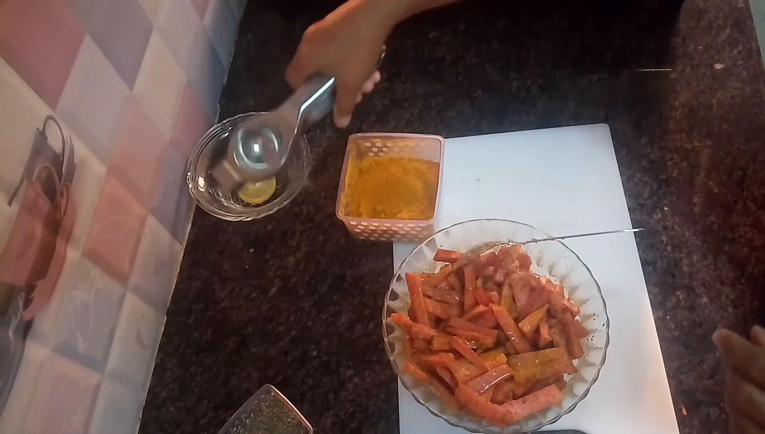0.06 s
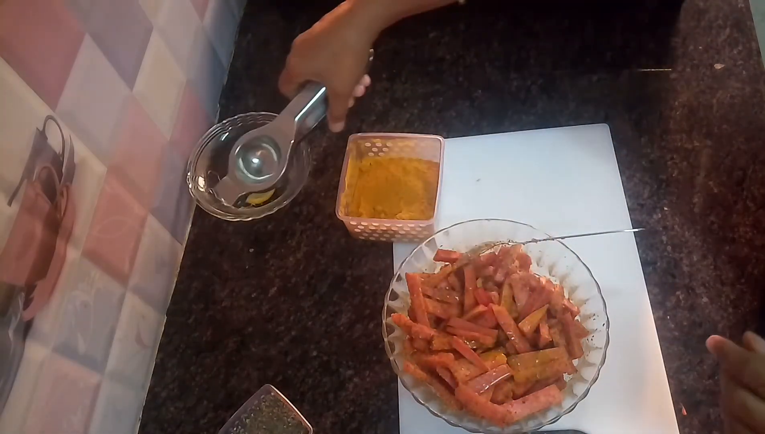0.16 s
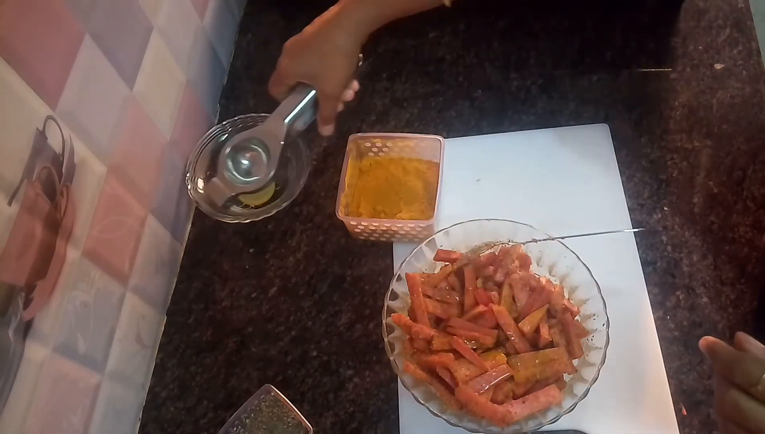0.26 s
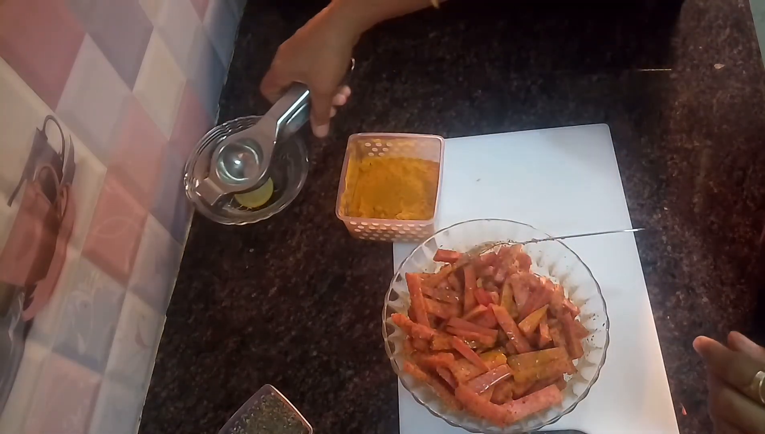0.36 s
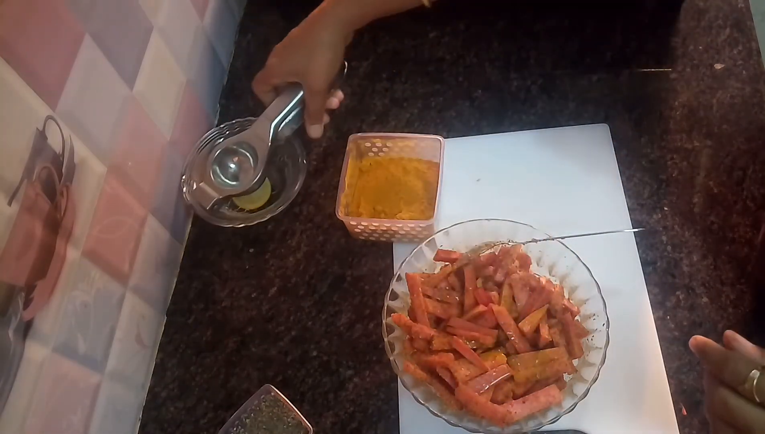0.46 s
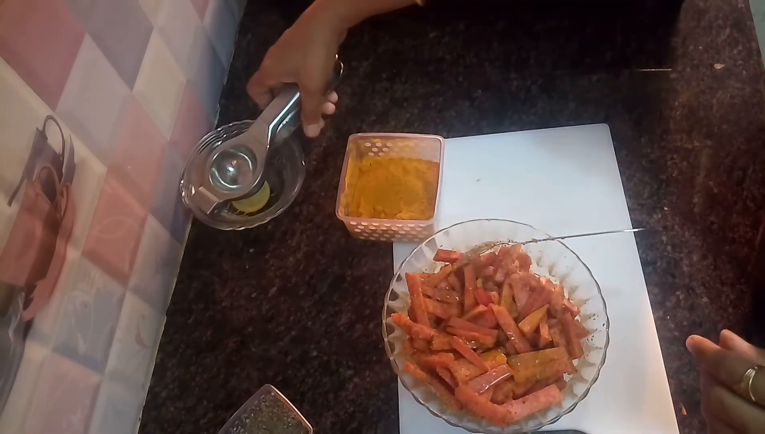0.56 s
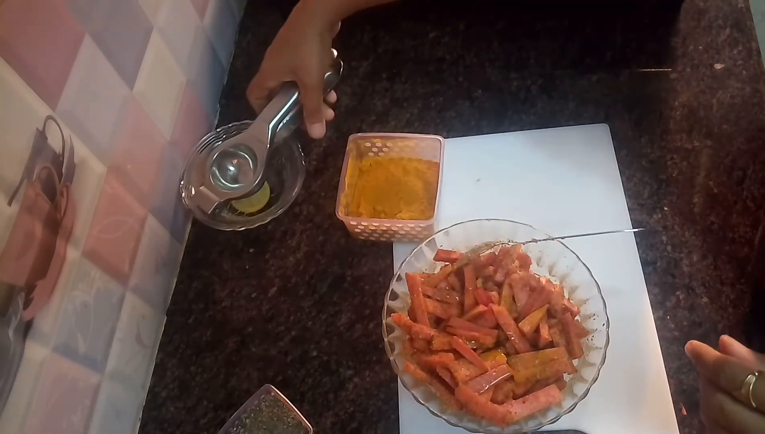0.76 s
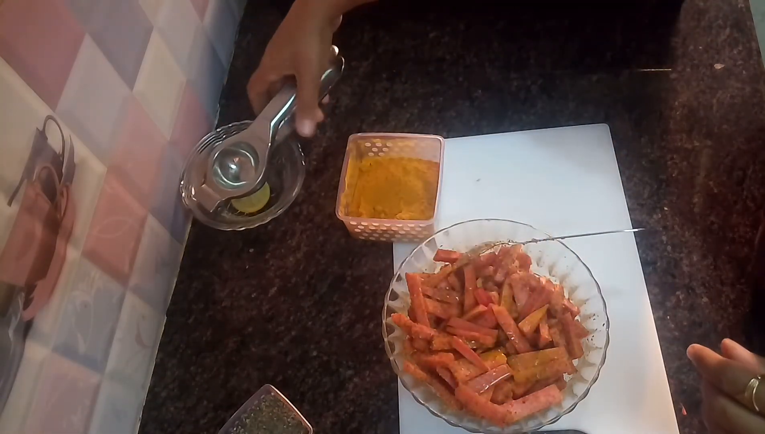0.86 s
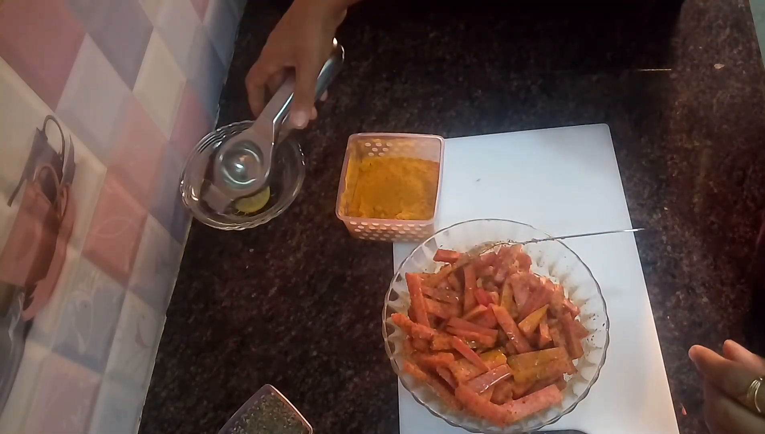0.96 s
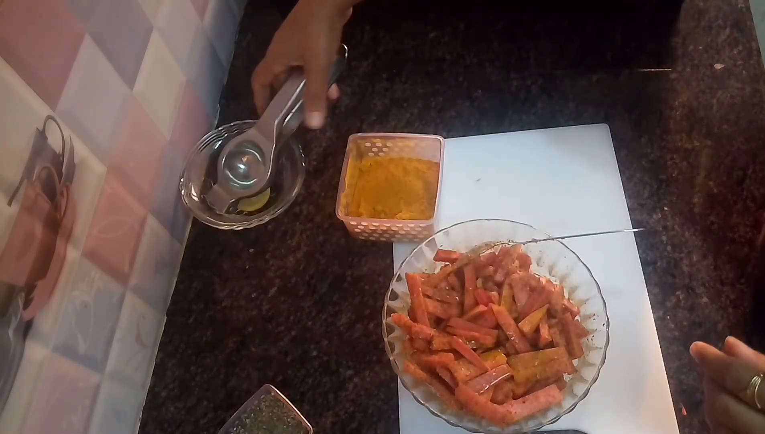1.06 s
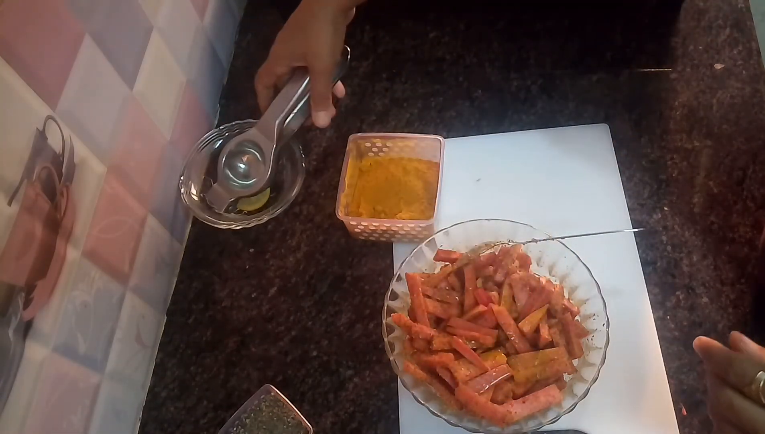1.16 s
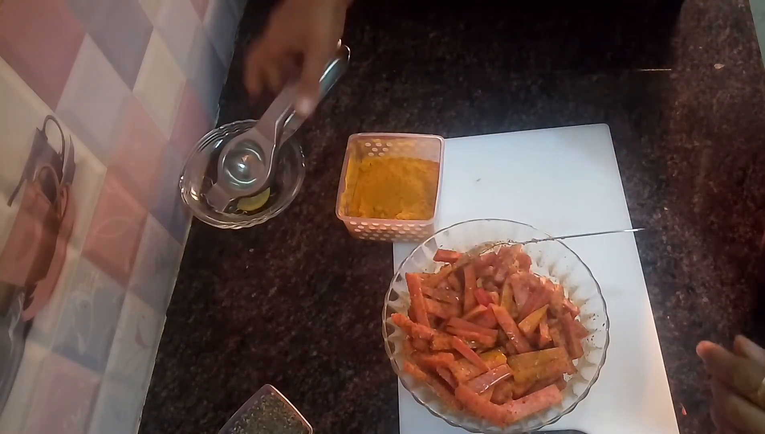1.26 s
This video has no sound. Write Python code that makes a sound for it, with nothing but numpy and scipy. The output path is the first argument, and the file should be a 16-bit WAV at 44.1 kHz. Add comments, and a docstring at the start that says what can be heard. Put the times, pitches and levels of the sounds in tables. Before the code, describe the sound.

A metal lemon squeezer clinks onto the rim of a small glass bowl at about 0.2 seconds, making it ring briefly. From 0.4 to 0.6 seconds its hinged steel arms clatter together and ring on a little. Near 1 second it shifts on the glass with a faint scrape and four soft taps. Everything is close, with a short kitchen echo and a low hum underneath.

```python
"""A tiled kitchen with a low hum; a stereo microphone close to a small glass bowl on a stone counter.
At 0.2 s a metal lemon squeezer is laid across the bowl, clinks on the rim and settles. Each contact
is a thud, a clack and a bright tick, and sets bowl and counter ringing while the room answers.
From 0.4 s its hinged steel arms clatter together and ring on a little.
Near 1 s the hand lets go and it shifts faintly on the glass, with a short scrape and four soft taps."""
import sys
import numpy as np
from scipy import signal
from scipy.fft import rfft, irfft
from scipy.io import wavfile

SR = 44100
rng = np.random.default_rng(int(sys.argv[2]) if len(sys.argv) > 2 else 0)


def int16_out(signal):
    """Quantize to a 16-bit WAV file."""
    q = np.round(np.clip(np.atleast_2d(signal).T, -1, 1) * 32767)
    wavfile.write(sys.argv[1], SR, q.astype(np.int16))


N = 57330

# hum and hiss of the house: pitch_hz, relative_db
HUM_COLOUR = [(25, -19), (60, -12), (100, -2.5), (140, 4), (200, -10), (330, -11.5), (620, -15.5),
              (1000, -20.5), (2500, -25), (6000, -26.5), (10000, -36.5), (15000, -31.5)]
# decay of the kitchen's echo: pitch_hz, t60_s
ECHO_DECAY = [(125, .5), (400, .5), (1200, 0.5457), (2500, 0.5), (5000, 0.3771), (8000, 0.2638),
              (14000, 0.4)]
# colour of that echo: pitch_hz, relative_db
ECHO_COLOUR = [(100, -0.5), (400, 0.5), (1200, 0), (3000, -3), (5500, 1), (8000, 6.5), (14000, -11)]
# how much louder the microphone hears on the left: pitch_hz, left_over_right_db
MIC_BALANCE = [(120, 3.5), (300, -0.5), (550, 1), (1400, 3), (2600, 0.5), (4600, 3), (7400, 6),
               (10000, -1.5), (13500, -2.5)]
# low resonances of the counter under the bowl: pitch_hz, relative_db, t60_s (capped in ring)
STONE_MODES = [(115.8, -4, 0.27), (143.5, -11.5, .2), (216, -4, .15), (262, 0.5, 0.073), (307, 2.5, 0.1),
               (346, 3, 0.47), (370, -9.5, 0.4), (440, -6.5, 0.33), (510, -10.5, 0.23), (608, -4, 0.36)]
# modes of the loaded bowl, one list each: pitch_hz, relative_db, t60_s (capped in ring)
GLASS_HZ = [644, 723, 941, 1108, 1348, 1518, 1715, 1790, 3012, 4434, 4516, 7413, 7520, 10250, 10520, 13300,
            13740]
GLASS_DB = [-8, -17, -15, -15.5, -19, -11.5, -11, -7, -12.5, -5.5, 0.5, -11.5, -20.5, -24, -21, -26, -21.5]
GLASS_T60_S = [0.11, .24, 0.29, 0.26, 0.84, .28, .3, 0.77, 0.25, .14, .14, .16, 0.062, 0.2, 0.13, .06, .06]
# modes of the steel arms, one list each: pitch_hz, relative_db, t60_s (capped in ring)
STEEL_HZ = [955, 1010, 1179, 1330, 1462, 5050]
STEEL_DB = [-7, -7.5, 6, -12.5, 2, -8]
STEEL_T60_S = [0.32, 0.6, 0.26, .25, .2, .18]
# arm against arm: start_s, contact_ms, thud_db, clack_db, tick_db, bowl_ring_db, pan_left_db
ARM_KNOCKS = [ (0.3954, 2, -8, -11.5, -19, -27.5, -2.5), (0.399, 4, -18, -3, -12.5, -16.5, -5.5),
              (0.4425, 4.4, -20.5, 0.5, -25, -27.5, -4), (0.449, 3.9, -20.5, -3, -20.5, -7.5, -4.5),
              (0.4756, 4.1, -14.5, -18, -25, -23, -4.5), (0.4918, 1.2, -20.5, -7, -30.5, -34.5, -5),
              (0.5456, 1.5, -34.5, -19, -9.5, -29.5, -6.5), (0.549, 0.59, -29.5, -13.5, -11.5, -25, 2),
              (0.5515, 1.4, -20.5, -3, -20, -27.5, -6.5), ]
# spectra of an arm knock's three parts: pitch_hz, relative_db
ARM_THUD_COLOUR = [(30, -27), (70, -23.5), (120, -8), (205, -11.5), (290, -3), (370, 1.5), (470, -11.5),
                   (640, 3.5), (830, -10), (2000, -32.5), (8000, -74.5)]
ARM_CLACK_COLOUR = [(100, -35.5), (400, -15), (620, -7), (800, -8), (1000, 2.5), (1400, 5), (1800, -6),
                    (2400, -9.5), (3500, -14.5), (7000, -45.5), (15000, -71.5)]
ARM_TICK_COLOUR = [(500, -19), (1800, 9), (2500, 10), (3200, -16), (4400, 6), (5200, 4.5), (6700, -7),
                   (7700, -2), (9000, -34.5), (10400, -4.5), (12000, -21.5), (15500, -37)]
# squeezer on the rim: start_s, contact_ms, thud_db, clack_db, tick_db, bowl_ring_db, pan_left_db
RIM_KNOCKS = [ (0.2239, 0.6, -10, -7.5, 2, 3, -3.5), (0.2300, 5.85, -11, -0.5, -10.5, -26, -6),
              (0.2505, 1.1, -14.5, 0.5, -13, -12.5, -0.5), (0.2590, 4.3, -10.5, -1, -19.5, -20, -3),
              (1.0020, 7.0, -34.5, -38, -40, -24, -8.5), (1.0220, 6.0, -48.5, -40.5, -41.5, -72, -8.5),
              (1.0430, 3.95, -33, -27, -64, -58, -7), (1.0680, 11, -46, -36.5, -62, -55, -2), ]
# spectra of a rim knock's three parts: pitch_hz, relative_db
RIM_THUD_COLOUR = [(30, -22), (70, -24), (115, 0.5), (175, -11.5), (230, -3), (330, -7.5), (450, -6),
                   (680, 1), (830, -10.5), (2000, -37), (8000, -70.5)]
RIM_CLACK_COLOUR = [(100, -27), (400, -11), (700, 2), (830, -6), (1000, 2.5), (1250, -1), (1550, 8),
                    (1900, 1), (2400, -1.5), (3600, -25.5), (7000, -41), (15000, -68)]
RIM_TICK_COLOUR = [(500, -22), (2400, -24), (3100, 7.5), (3900, -5.5), (4600, 4.5), (5600, -1.5),
                   (6700, -12), (7500, -8.5), (9000, -29.5), (10400, -6), (11900, -54), (13500, -36),
                   (15500, -56)]

LEFT_LAG_S = .00022  # sound reaches the microphone's left side later
ROOM_BLUR_HZ, DIRECT_BLUR_HZ = 2336, 5500  # left and right grow unalike above these pitches
NEAR_DB, NEAR_T60_S, NEAR_BUILD_S = -4.5, .09, .001  # counter and wall tiles close by
ROOM_DB, ROOM_BUILD_S = -9, .0028
THUD_T60_S, CLACK_T60_S, TICK_T60_S = .14, .04, .0077
BOWL_RING_DB, ARM_RING_DB, COUNTER_RING_DB = -.5, -15.5, -6.5
LONGEST_T60_S = .42
TWIN_DB, TWIN_SPREAD = -4, .004  # each mode beats with a twin, detuned at random by about this share
DULL_HZ, DULL_DB_PER_MS = 4746, -2  # treble change one octave above this pitch, per ms of contact


def undb(db):
    """Decibels to gain."""
    return 10 ** (np.asarray(db) / 20)


def unit(x):
    """Scale to a mean energy of one per channel."""
    return x / np.sqrt(np.mean(np.sum(x ** 2, axis=-1)) + 1e-18)


def fade(t, t60):
    """Exponential decay by 60 dB in t60 seconds."""
    return np.exp(-np.log(1000) * t / np.maximum(t60, 1e-3))


def on_bins(points, size):
    """Interpolate (pitch_hz, value) points onto the bins of a spectrum."""
    hz, value = np.array(points, float).T
    return np.interp(np.log(np.arange(size // 2 + 1) * SR / size + 1), np.log(hz), value)


def convolve(x, response):
    """Pass a sound through a response."""
    return signal.fftconvolve(np.atleast_2d(x), np.atleast_2d(response), axes=-1)[:, :N]


def colour(x, points, size=8192):
    """Causal filter of unit energy, shaped by (pitch_hz, relative_db) points."""
    cepstrum = irfft(np.log(undb(on_bins(points, size))))
    cepstrum[1:size // 2] *= 2  # fold to minimum phase
    cepstrum[size // 2 + 1:] = 0
    return convolve(x, unit(irfft(np.exp(rfft(cepstrum)))))


def stereo_noise(size, blur_hz=ROOM_BLUR_HZ):
    """Noise at the microphone's two sides: alike in the bass, unrelated in the treble."""
    mid, side = rfft(rng.standard_normal((2, size)))
    alike = 1 / (1 + (np.arange(len(mid)) * SR / size / blur_hz) ** 2)
    mid *= np.sqrt((1 + alike) / 2)
    side *= np.sqrt((1 - alike) / 2)
    return irfft([mid + side, mid - side], size)


def place(out, sound, start_s, pan_db):
    """Add a sound at its time and bearing; positive pan is to the left."""
    sound = np.broadcast_to(sound, (2, sound.shape[-1]))
    for channel, (lag_s, sign) in enumerate([(LEFT_LAG_S, 1), (0, -1)]):
        first = int(np.clip((start_s + lag_s) * SR, 0, N - 1))
        part = sound[channel, :N - first]
        out[channel, first:first + len(part)] += part * undb(sign * pan_db / 2)


def house_hum(level_db=-69):
    """Room tone: the low hum of the house with faint hiss."""
    return undb(level_db) * colour(stereo_noise(N), HUM_COLOUR)


def kitchen_echo(direct, size=32768):
    """Quick reflections from the counter and nearby tiles, then the tail of the room."""
    t = np.arange(size) / SR
    near = unit(stereo_noise(size) * fade(t, NEAR_T60_S) * (1 - np.exp(-(t / NEAR_BUILD_S) ** 2)))
    spectrum, tail = rfft(stereo_noise(size)), 0
    for hz, t60 in ECHO_DECAY:
        band = on_bins([(centre, centre == hz) for centre, _ in ECHO_DECAY], size)
        tail = tail + irfft(spectrum * band) * fade(t, t60)
    tail *= 1 - np.exp(-(t / ROOM_BUILD_S) ** 2)
    tail = unit(colour(tail, ECHO_COLOUR))
    centred = direct * np.sqrt(np.mean(direct ** 2) / np.mean(direct ** 2, axis=1, keepdims=True))
    return convolve(direct, undb(NEAR_DB) * near) + convolve(centred, undb(ROOM_DB) * tail)


def dullness(hz, contact_ms):
    """Treble gain in dB: a longer contact loses more, ever more steeply towards the top."""
    return DULL_DB_PER_MS * contact_ms * np.log2(np.maximum(hz / DULL_HZ, 1)) ** 2


def ring(modes, contact_ms=0, size=32768):
    """Free, beating ring of an object's modes after one blow."""
    t = np.arange(size) / SR
    hz, db, t60 = np.array(list(modes), float).T[:, :, None]
    phase, twin_phase = 2 * np.pi * rng.random((2,) + hz.shape)
    twin_hz = hz * (1 + TWIN_SPREAD * rng.standard_normal(hz.shape))
    waves = np.sin(2 * np.pi * hz * t + phase)
    waves += undb(TWIN_DB) * np.sin(2 * np.pi * twin_hz * t + twin_phase)
    attack = 1 - np.exp(-t * np.minimum(hz, DULL_HZ) / 2)
    envelope = attack * fade(t, np.minimum(t60, LONGEST_T60_S))
    return unit(np.sum(undb(db + dullness(hz, contact_ms)) * envelope * waves, axis=0))


def bowl_ring(contact_ms):
    """The glass bowl rings with the squeezer lying on it."""
    return ring(zip(GLASS_HZ, GLASS_DB, GLASS_T60_S), contact_ms)


def chatter(contact_ms, t60, size=8192):
    """Dense, quickly damped vibration that builds while the surfaces touch."""
    t = np.arange(size) / SR
    contact_s = contact_ms / 1000
    envelope = np.minimum(t / contact_s, 1) * fade(np.maximum(t - contact_s, 0), t60)
    burst = stereo_noise(size, DIRECT_BLUR_HZ) * envelope
    late_fade = fade(np.maximum(t - contact_s - t60 / 2, 0), t60)
    for _ in range(2):  # a blow feeds neighbouring pitches evenly
        spectrum = rfft(burst)
        burst = irfft(spectrum / (np.abs(spectrum) + 1e-9)) * late_fade
    treble = undb(dullness(np.arange(size // 2 + 1) * SR / size, contact_ms))
    return irfft(rfft(unit(burst)) * treble)[:, :size - 1024]  # cut the filter's wrap-around


def contacts(knocks, thud_colour, clack_colour, tick_colour):
    """Every contact thuds, clacks and ticks, and rings the bowl and the counter under it."""
    thud, clack, tick, rings = np.zeros((4, 2, N))
    for start_s, contact_ms, thud_db, clack_db, tick_db, ring_db, pan_db in knocks:
        place(thud, undb(thud_db) * chatter(contact_ms, THUD_T60_S), start_s, pan_db)
        place(clack, undb(clack_db) * chatter(contact_ms, CLACK_T60_S), start_s, pan_db)
        place(tick, undb(tick_db) * chatter(contact_ms, TICK_T60_S), start_s, pan_db)
        place(rings, undb(ring_db + BOWL_RING_DB) * bowl_ring(contact_ms), start_s, pan_db)
        place(rings, undb(thud_db + COUNTER_RING_DB) * ring(STONE_MODES), start_s, pan_db=0)
    return colour(thud, thud_colour) + colour(clack, clack_colour) + colour(tick, tick_colour) + rings


def rim_scrape(peak_s=1.0104, rise_db_per_s=331, fall_db_per_s=403):
    """Steel slides on the rim, right of centre: uneven friction swells, rasps and makes the glass sing."""
    t = np.arange(N) / SR - peak_s
    swell_db = np.minimum(t * rise_db_per_s, -t * fall_db_per_s)
    friction = stereo_noise(N) * undb(swell_db + 3 * rng.standard_normal(N))
    rasp = undb(-29.5) * unit(colour(friction, RIM_CLACK_COLOUR))
    grit = undb(-33.5) * unit(colour(friction, RIM_TICK_COLOUR))
    singing = undb(-27.5) * unit(convolve(friction[0], bowl_ring(contact_ms=2.5)))
    out = np.zeros((2, N))
    place(out, rasp + grit + singing, start_s=0, pan_db=-7)
    return out


def arm_clatter():
    """The hinged arms knock together; the harder the clack, the louder the steel rings."""
    out = contacts(ARM_KNOCKS, ARM_THUD_COLOUR, ARM_CLACK_COLOUR, ARM_TICK_COLOUR)
    for start_s, _, _, clack_db, _, _, pan_db in ARM_KNOCKS:
        steel = ring(zip(STEEL_HZ, STEEL_DB, STEEL_T60_S))
        place(out, undb(clack_db + ARM_RING_DB) * steel, start_s, pan_db)
    return out


def rim_clinks():
    """The squeezer lands on the glass rim, then taps it softly as the hand lets go."""
    return contacts(RIM_KNOCKS, RIM_THUD_COLOUR, RIM_CLACK_COLOUR, RIM_TICK_COLOUR)


def scene():
    """Squeezer, bowl and kitchen at a close microphone whose two sides colour them differently."""
    direct = rim_clinks() + arm_clatter() + rim_scrape()
    spectrum = rfft(direct + kitchen_echo(direct), 2 * N)
    balance_db = on_bins(MIC_BALANCE, 2 * N)
    mic_gain = undb([balance_db / 2, -balance_db / 2])
    return irfft(spectrum * mic_gain)[:, :N] + house_hum()


def record(dry):
    """The recorder cuts the treble steeply above 15.6 kHz."""
    return signal.sosfilt(signal.ellip(8, .2, 70, 15600, fs=SR, output="sos"), dry)


dry = scene()
out = record(dry)
int16_out(out)
```